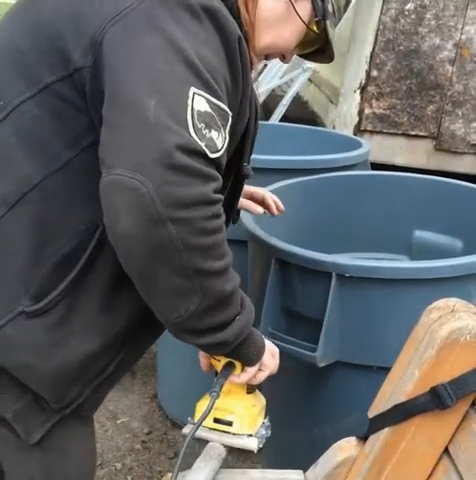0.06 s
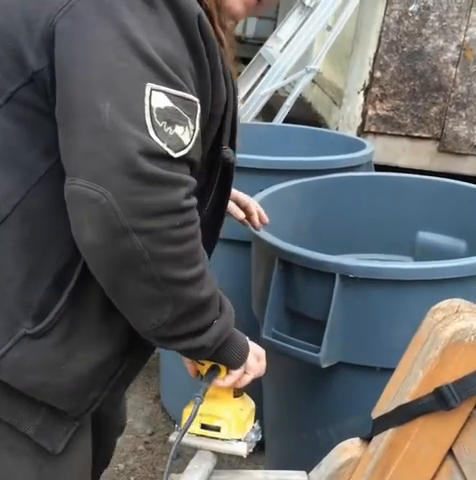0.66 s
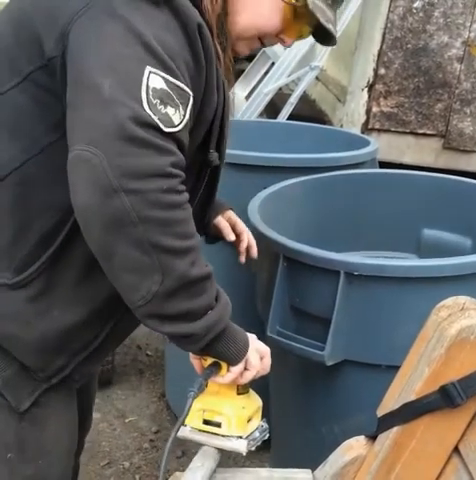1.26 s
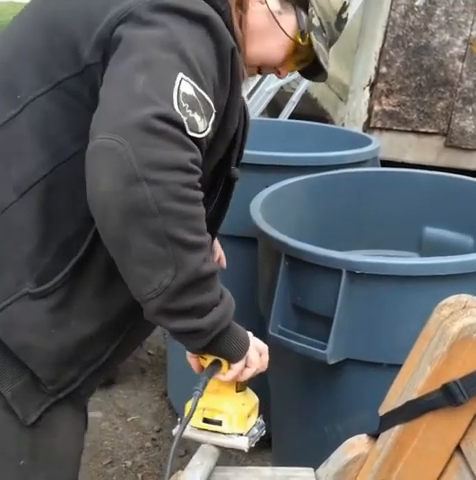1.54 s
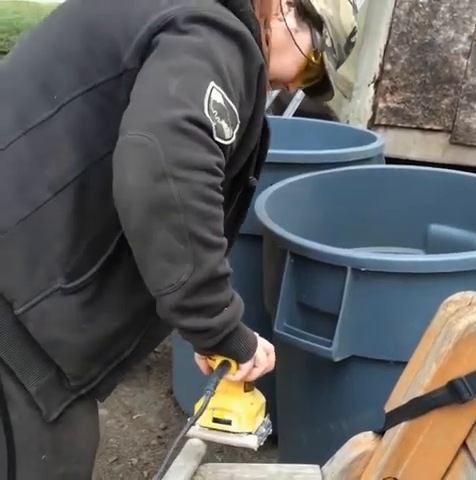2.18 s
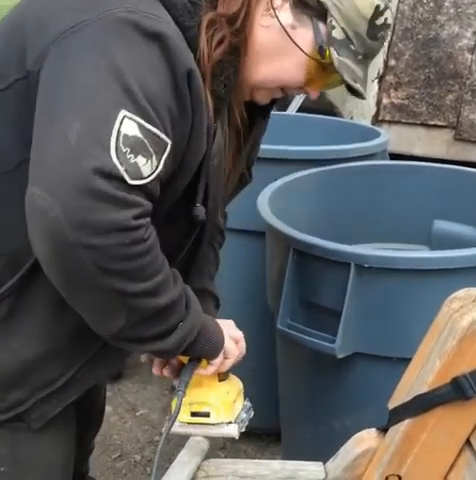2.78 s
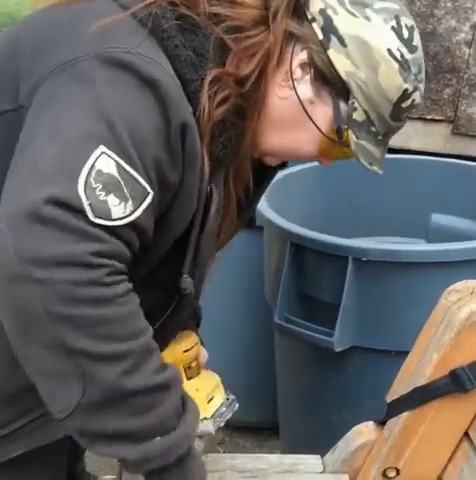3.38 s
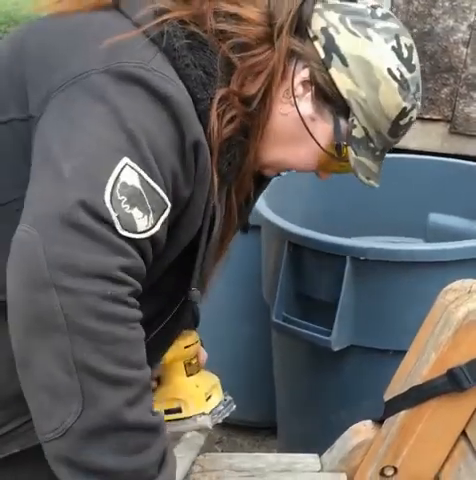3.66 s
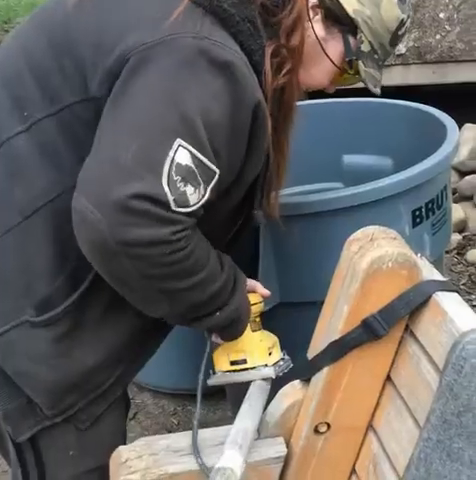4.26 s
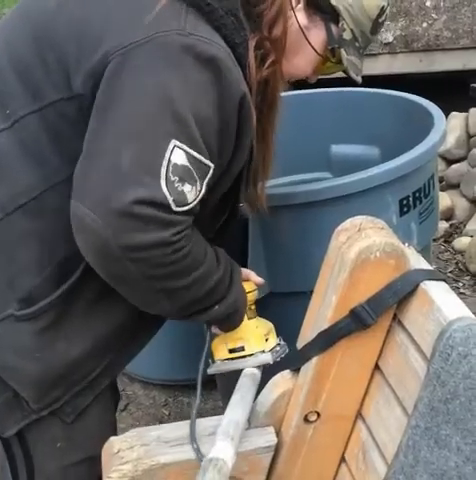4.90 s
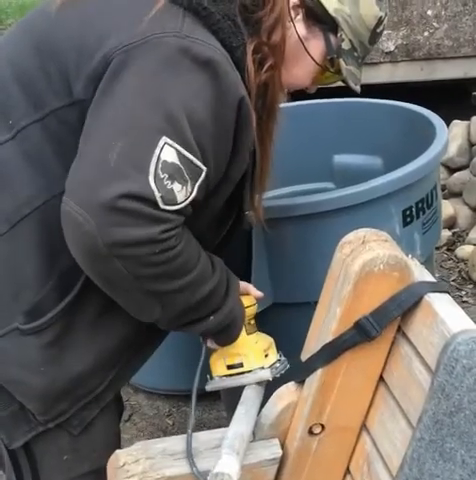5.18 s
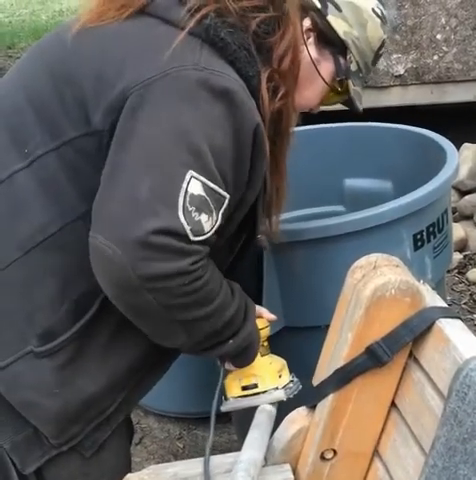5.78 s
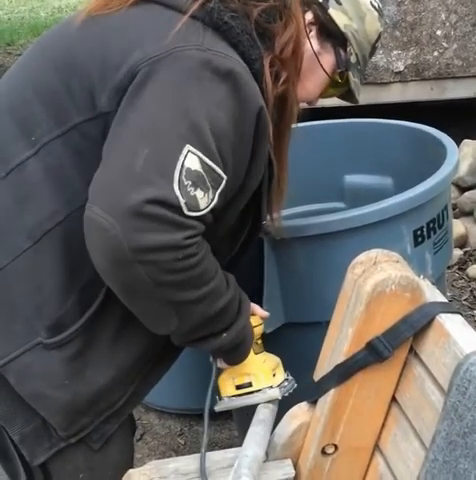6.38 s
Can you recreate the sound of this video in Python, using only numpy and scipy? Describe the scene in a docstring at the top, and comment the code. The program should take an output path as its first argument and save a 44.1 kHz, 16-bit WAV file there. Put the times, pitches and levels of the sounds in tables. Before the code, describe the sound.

A small electric sander grinds on wood near the microphone, with a droning hum, a whine and a gritty rasp that swell slightly with each stroke. The pressure eases and the tool slows into a descending buzz. The sound cuts out for a split second, then resumes at full speed with a slightly different wooden tone and stays even, over a faint outdoor rumble.

```python
"""Outdoors, over a faint low rumble, a mains-powered palm sander works a wooden handle.
Its weighted shaft hums, its loaded motor whines, its pad chatters on the ringing wood, its grit hisses.
The motor sags as the tool is shifted, and the pad knocks once a turn in an even, falling buzz.
After an instant of silence the sander is at full speed again on a second spot of the handle."""
import sys
import numpy as np
from scipy import signal
from scipy.fft import rfft, irfft, next_fast_len
from scipy.io import wavfile
from scipy.ndimage import map_coordinates

SR = 44100
rng = np.random.default_rng(int(sys.argv[2]) if len(sys.argv) > 2 else 0)


def pcm_store(signal):
    """Save signal as 16-bit PCM."""
    levels = np.round(np.clip(np.atleast_2d(signal), -1, 1) * 32767)
    wavfile.write(sys.argv[1], SR, levels.astype(np.int16).T)


N = 293262
TIME_S = np.arange(N) / SR
SILENCE_S = (4.109, 4.155)  # between the two spots


def amp(db):
    """Decibels to gain."""
    return 10 ** (np.asarray(db) / 20)

def unit(x):
    """x at rms 1."""
    return x / np.sqrt(np.mean(x ** 2) + 1e-20)

def curves(rows):
    """One value per sample for each column after the time."""
    times_s, *columns = np.transpose(rows)
    return [np.interp(TIME_S, times_s, column) for column in columns]

def held(start_s, end_s, ramp_s):
    """Attack, hold and release, 0 to 1."""
    return np.clip(.5 + np.minimum(TIME_S - start_s, end_s - TIME_S) / ramp_s, 0, 1)

def swells(rows):
    """A sum of bell curves, one per (centre in seconds, half width in seconds, height)."""
    grid_s = TIME_S[::SR // 1000]
    total = sum(height * np.exp(-((grid_s - s) / width_s) ** 2) for s, width_s, height in rows)
    return np.interp(TIME_S, grid_s, total)

def wobble(rate_hz, size=N):
    """A smooth random curve with knots at rate_hz."""
    knots = rng.standard_normal(int(size * rate_hz / SR) + 4)
    return map_coordinates(knots, [np.arange(size) * rate_hz / SR])

def by_spot(first, second):
    """One value on the first spot, another on the second."""
    return np.where(TIME_S < np.mean(SILENCE_S), first, second)

def body_response(spectrum, resonances=()):
    """Frequencies and causal log response (log gain + j phase) of a ringing body."""
    size = 2 * next_fast_len(N // 2 + SR // 4)
    hz = np.fft.rfftfreq(size, 1 / SR)
    knots_hz, knots_db = np.transpose(spectrum)
    db = np.interp(np.log(hz + 1), np.log(knots_hz), knots_db)
    for centre_hz, width_hz, lift_db in resonances:
        db += lift_db / (1 + (2 * (hz - centre_hz) / width_hz) ** 2)
    cepstrum = irfft(np.log(amp(db)))
    cepstrum[size // 2:] = 0
    return hz, rfft(2 * cepstrum)

def colour(x, spectrum, resonances=()):
    """x rung through a body, at rms 1."""
    hz, response = body_response(spectrum, resonances)
    return unit(irfft(rfft(x, 2 * (len(hz) - 1)) * np.exp(response))[:N])

def grains(force, per_s, spread_db):
    """Tiny impacts of uneven size, harder under more force."""
    hits = rng.random(N) < per_s / SR
    return force * hits * rng.choice([-1, 1], N) * amp(spread_db * rng.standard_normal(N))

# The rumble's swell, then the thump. Each row: centre in seconds, half width in seconds, level in dB.
LOW_SWELLS = [(3.92, 0.3, -54.5), (4.163, 0.02, -43)]

def rumble_and_thump(first_db=-72, second_db=-64.5):
    """A faint low rumble swells as the motor slows; a soft thump marks the cut where sound returns."""
    level = amp(by_spot(first_db, second_db))
    level += swells([(s, width_s, amp(db)) for s, width_s, db in LOW_SWELLS])
    return level * colour(rng.standard_normal(N), [(20, -8), (70, -1), (130, 6), (300, -6), (3000, -33)])

def with_echoes(x, echo_db=-14, spread_s=.025, count=14):
    """Ground, bench and bins throw back weak early echoes."""
    delays = (SR * (.002 + spread_s * rng.random(count))).astype(int)
    echoes = sum(rng.choice([-1, 1]) * np.pad(x, (delay, 0))[:N] for delay in delays)
    return x + amp(echo_db) * echoes / np.sqrt(count)

# Each row: time in seconds, contact in dB.
EASING = [(3.25, -1.5), (3.31, 0.5), (3.345, -8), (3.39, -5), (3.43, -1.5), (3.63, -2), (3.7, -12),
          (3.94, -18), (4.03, -9), (4.1, -19)]

def ease_db():
    """The hand eases the pad off the first spot."""
    return by_spot(curves(EASING)[0], 0)

def tilted():
    """1 while the pad stands on its edge."""
    return held(3.41, 3.67, ramp_s=0.17)

# The paper catches. Each row: centre in seconds, half width in seconds, lift in dB.
CATCHES = [(0.33, 0.059, 3), (0.71, 0.026, 6.5), (1.28, 0.14, 2.5), (1.72, 0.28, 1.5), (2.1, 0.059, 3.5),
           (2.62, 0.3, 3), (3.02, 0.17, 0.5), (5.0, 0.07, 1.5), (6.33, 0.05, 0.5), (6.55, 0.021, 2.5)]
# Each mix: first spot in dB, second spot in dB, share of catch, share of easing, tilt change in dB.
CHATTER_MIX = (-24, -24.5, 0.86, 1, 0)
RASP_MIX = (-20.5, -22.5, 0.27, 0.62, -3)
HISS_MIX = (-26, -26.5, 0.17, 0.21, -2.5)

def layer_db(mix, waver_db=0.5):
    """A contact layer rises as the paper catches and falls as the pad is eased off or tilted."""
    first_db, second_db, catch_share, ease_share, tilt_db = mix
    base_db = by_spot(first_db, second_db) + waver_db * wobble(11)
    return base_db + catch_share * swells(CATCHES) + ease_share * ease_db() + tilt_db * tilted()

# Each row: time in seconds, shaft speed in Hz, hum in dB.
MOTOR = [(0, 216.8, -35), (0.72, 208, -31.5), (1.17, 210, -35), (1.43, 203.8, -38.5), (1.85, 206.2, -38),
         (2.3, 209.7, -36), (2.56, 209.7, -36), (2.68, 213, -35), (3.04, 213.3, -33), (3.15, 201.5, -35),
         (3.27, 195.9, -37), (3.32, 191.5, -34.5), (3.41, 181.9, -34.5), (3.5, 179.5, -37),
         (3.6, 179.8, -35.5), (3.655, 177.4, -36), (3.7, 171.2, -36), (3.76, 161.8, -37),
         (3.88, 149.4, -39), (3.955, 139, -48), (4.0, 135.5, -42.5), (4.11, 123.1, -43),
         (4.135, 208.6, -38), (4.22, 208, -35.5), (4.7, 208.9, -36), (4.85, 210.4, -37),
         (5.3, 210.5, -36.5), (5.75, 208, -38.5), (6.65, 210.8, -36)]
# Hand strokes rock the pad. Each row: centre in seconds, swell of the hum's octave in dB.
STROKES = [(0.52, -39.5), (2.03, -40), (2.92, -48), (4.28, -45), (4.66, -43.5), (5.14, -46), (5.49, -44.5),
           (5.96, -44), (6.36, -44)]
STROKE_HALF_WIDTH_S = 0.0849

def motor(drag_hz=1.2, dip_db=2.5, flutter_hz=0.607):
    """Shaft speed and hum level: each stroke drags the motor and weakens its fundamental."""
    shaft_hz, hum_db = curves(MOTOR)
    push = swells([(s, STROKE_HALF_WIDTH_S, 1) for s, _ in STROKES])
    push -= push.mean()
    return shaft_hz - drag_hz * push + flutter_hz * wobble(16), hum_db - dip_db * push

# Housing resonances that the third order slides through. Each row: frequency in Hz, level in dB.
THIRD_ORDER = [(390, -42.5), (460, -42.5), (513, -29), (540, -29.5), (562, -29), (590, -41), (614, -35),
               (628, -36), (645, -37.5)]

def hum(angle, shaft_hz, hum_db, octave_floor_db=-54.5, eased_octave_re_hum_db=-7.5):
    """The off-centre weight shakes the housing at the first three multiples of the shaft speed."""
    eased = held(EASING[0][0], SILENCE_S[0], ramp_s=0.17)
    octave = amp(octave_floor_db) + swells([(s, STROKE_HALF_WIDTH_S, amp(db)) for s, db in STROKES])
    octave += amp(hum_db + eased_octave_re_hum_db) * eased
    third_db = np.interp(3 * shaft_hz, *np.transpose(THIRD_ORDER)) + by_spot(0, -1.5)
    jostle_rad = 0.19 * amp(ease_db()) * wobble(55)  # the wood jostles the overtones
    out = np.zeros(N)
    for order, level in enumerate([amp(hum_db), octave, amp(third_db)], 1):
        flicker = amp(0.41 * order * wobble(10)) * (1 + 0.069 * order * wobble(45))
        out += level * flicker * np.sqrt(2) * np.sin(order * angle + (order - 1) * jostle_rad)
    return out

# Each row: shaft order, ripple order, dB over the chatter on the first spot, the same on the second.
WHINE_TONES = [(0.98, 1, -50, -31), (2.007, -1, -36.5, -30), (2, 1, -25.5, -27), (3, 1, -21.5, -16),
               (5, -1, -16, -8), (6, 0, -20, -15), (7, 0, -14, -26), (8, -1, -16.5, -14),
               (8, 0, -13.5, -16), (9, 0, -16, -20), (11, 0, -21, -20), (13, 0, -26, -20)]

def whine(angle, ripple, waver_db=2.5, drift_rad=0.34, grind_rad=0.053):
    """The loaded motor sings, with side tones from the mains torque; grinding roughens high orders."""
    load_db = layer_db(CHATTER_MIX)
    out = np.zeros(N)
    for order, ripple_order, first_db, second_db in WHINE_TONES:
        level = amp(load_db + by_spot(first_db, second_db) + waver_db * wobble(16))
        jitter_rad = drift_rad * wobble(25) + grind_rad * order * wobble(70)
        out += level * np.sqrt(2) * np.sin(order * angle + ripple_order * ripple + jitter_rad)
    return out

# Each row: start in seconds, end in seconds, shaft order, ripple order, level in dB.
SUNG_TONES = [(2.62, 3.05, 13, 0, -33), (2.64, 3.0, 14, 0, -39), (2.58, 2.85, 15, 0, -36),
              (2.747, 3.2, 6, 0, -34), (3.08, 3.3, 8, 0, -30), (3.29, 3.39, 16, 0, -34),
              (3.325, 3.41, 14, 0, -31), (3.322, 3.408, 8, 0, -23), (3.3, 3.41, 5, 0, -30),
              (3.32, 3.41, 7, 0, -32), (4.18, 4.27, 5, -1, -24.5), (4.38, 4.44, 5, -1, -29),
              (4.537, 4.697, 5, -1, -27), (4.898, 5.112, 5, -1, -27), (5.2, 5.6, 5, -1, -26.5),
              (5.651, 6.05, 5, -1, -30.5), (6.14, 6.41, 5, -1, -24), (6.52, 6.61, 5, -1, -32)]

def singing(angle, ripple, waver_db=0.5, drift_rad=0.44):
    """For a moment the pad falls in with one motor tone and holds it."""
    out = np.zeros(N)
    for start_s, end_s, order, ripple_order, db in SUNG_TONES:
        level = amp(db) * held(start_s, end_s, ramp_s=0.047)
        on = level > 0
        phase = order * angle[on] + ripple_order * ripple[on] + drift_rad * wobble(31.3, on.sum())
        out[on] += level[on] * amp(waver_db * wobble(34, on.sum())) * np.sqrt(2) * np.cos(phase)
    return out

# Each row: start in seconds, end in seconds, gain in dB.
BUZZ_SPELLS = [(3.32, 3.42, -5.5), (3.42, 3.67, -7), (3.67, 3.785, 0.5), (3.785, 3.946, 1),
               (3.953, 4.15, -4.5)]
# Ring of the tapping pad. Each row: frequency in Hz, level of an overtone there in dB.
PAD_RING = [(500, -34.5), (650, -33), (820, -35), (960, -35), (1050, -36), (1210, -30), (1330, -41),
            (1410, -28.5), (1490, -24.5), (1560, -26.5), (1640, -28), (1735, -38.5), (1890, -31),
            (2100, -37), (2280, -38.5), (2480, -39.5), (2680, -33.5), (3000, -50), (3200, -42), (3550, -48),
            (4100, -47), (4500, -45), (4780, -43), (5100, -49), (5500, -42), (5850, -47), (6280, -42),
            (6600, -49), (7000, -48), (8500, -51)]
# Shape of the knock. Each row: shaft order, lift in dB.
KNOCK_LIFTS = [(5, 4), (6, 0), (7, 1), (8, -12), (11, -2)]

def buzz(angle, shaft_hz, waver_db=2.3, drift_rad=0.014, scatter_rad=0.95):
    """Lightly loaded, the pad knocks once a turn; the overtones slide down through its resonances."""
    level = sum(amp(db) * held(start_s, end_s, ramp_s=0.043) for start_s, end_s, db in BUZZ_SPELLS)
    on = level > 0
    hz, response = body_response(PAD_RING)
    out = np.zeros(N)
    for order in range(4, 56):
        tone_hz = order * shaft_hz[on]
        db = np.interp(tone_hz, *np.transpose(PAD_RING)) + dict(KNOCK_LIFTS).get(order, 0)
        lag_rad = np.interp(tone_hz, hz, response.imag) + scatter_rad * rng.standard_normal()
        phase = order * angle[on] + lag_rad + drift_rad * order * wobble(90.3, on.sum())
        out[on] += amp(db + waver_db * wobble(20.35, on.sum())) * np.sqrt(2) * np.sin(phase)
    return level * out

def pad_force(angle, ripple):
    """Pad force swings with the orbit, the mains ripple and the beats between the two."""
    orbit = 0.06 * (np.cos(angle) + np.cos(2 * angle))
    beats = 0.095 * np.cos(angle - ripple) + 0.038 * np.cos(angle - 2 * ripple)
    stutter = 0.045 * wobble(70)
    return np.exp(orbit + 0.047 * np.cos(ripple) + beats + stutter)

# Each row: centre in seconds, half width in seconds, frequency in Hz, bandwidth in Hz, level in dB.
WOOD_RINGS = [(0.06, 0.07, 1046, 120, -25.5), (0.45, 0.4, 1620, 160, -28.5), (0.65, 0.29, 1895, 70, -29),
              (1.26, 0.14, 982, 80, -25), (1.25, 0.59, 3520, 600, -29.5), (1.72, 0.17, 984, 110, -26.5),
              (1.8, 0.12, 1880, 60, -33), (2.08, 0.18, 880, 70, -29), (2.2, 0.14, 1027, 60, -27),
              (2.35, 0.3, 1880, 70, -32), (2.66, 0.069, 1630, 110, -25), (3.02, 0.26, 1013, 110, -25),
              (3.25, 0.07, 960, 129, -26.5), (3.22, 0.1, 1550, 130, -32), (3.56, 0.1, 1470, 110, -28),
              (4.07, 0.05, 1600, 900, -29)]

def ringing(force):
    """Bounces of the passing pad stir one resonance of the wood for a while."""
    out = np.zeros(N)
    for centre_s, width_s, hz, width_hz, db in WOOD_RINGS:
        b, a = signal.iirpeak(hz, hz / (1.5 * width_hz), SR)  # two passes narrow it to about width_hz
        bounces = grains(force, per_s=1500, spread_db=0.5)
        ring = signal.lfilter(b, a, signal.lfilter(b, a, bounces))
        out += amp(db) * np.exp(-((TIME_S - centre_s) / width_s) ** 2) * unit(ring)
    return out

# Each row: frequency in Hz, bandwidth in Hz, lift in dB.
FIRST_SPOT_MODES = [(548, 54, 8.5), (859, 50, 4), (1043, 120, 10), (1380, 50, -0.5), (1605, 205, 9),
                    (1780, 63, -2.5), (1880, 120, 8.5), (1980, 110, -2), (2400, 360, 4.5), (3700, 630, 2),
                    (4500, 89, 4), (5930, 300, -0.5)]
SECOND_SPOT_MODES = [(547, 65, 9.5), (734, 12, 6), (917, 105, 8.5), (1058, 130, 7.5), (1210, 55, -12),
                     (1559, 59, 6.5), (1670, 97, 9.5), (1830, 100, 0.5), (2017, 160, 9), (2360, 200, 6.5),
                     (2520, 100, 2.5), (2734, 77, 7.5), (3630, 330, 1.5), (4830, 270, 1.5), (5270, 220, -3),
                     (5440, 180, 2), (8000, 270, 1.5)]

def wood(x, spectrum):
    """Pad and handle resonate with their own modes on each spot."""
    return by_spot(colour(x, spectrum, FIRST_SPOT_MODES), colour(x, spectrum, SECOND_SPOT_MODES))

def wander(x, depth_s=0.0016, rate_hz=5):
    """The resonances drift in pitch as the pad moves about."""
    return map_coordinates(x, [np.arange(N) + depth_s * SR * wobble(rate_hz)], mode="mirror")

# Contact spectra. Each row: frequency in Hz, relative density in dB.
CHATTER_SPECTRUM = [(30, -53), (100, -33), (180, -12), (280, -16.5), (450, -15.5), (680, -10), (820, -1.5),
                    (1100, -1.5), (1300, -0.5), (1700, -24), (3000, -50.5)]
RASP_SPECTRUM = [(400, -35.5), (1000, -15), (1350, -5), (2000, -4), (3000, -5), (4200, -8), (5500, -9.5),
                 (9000, -43)]
HISS_SPECTRUM = [(1500, -32), (3800, -1.5), (5200, -1), (7000, 1), (10000, -3.5), (13000, -8),
                 (15300, -13.5)]
THIN_HISS_SPECTRUM = [(1500, -21), (2600, -2), (3800, -4.5), (5500, -2.5), (7500, -1), (10000, -3),
                      (13000, -8), (15300, -12)]
# The grit bites or skips. Each row: centre in seconds, half width in seconds, hiss change in dB.
GRIT_BITES = [(0.13, 0.03, 2.5), (0.707, 0.012, 3), (1.03, 0.014, 2), (1.28, 0.015, 3), (2.105, 0.017, 2.5),
              (2.65, 0.03, 1.5), (3.49, 0.025, -3.5), (3.745, 0.019, 3)]

def sanding(force, edge_db=-24):
    """The pad bounces and rasps as the grit cuts; tilted, its edge scrapes; lifted, the hiss thins."""
    chatter_gain = amp(layer_db(CHATTER_MIX, waver_db=0))
    rasp_gain = amp(layer_db(RASP_MIX))
    hiss_gain = amp(layer_db(HISS_MIX) + swells(GRIT_BITES))
    chatter = wander(wood(grains(force, per_s=2500, spread_db=1), CHATTER_SPECTRUM))
    rasp = wood(grains(force, per_s=12000, spread_db=2.5), RASP_SPECTRUM)
    cuts = grains(force, per_s=25000, spread_db=3.5)
    lifted = held(3.67, 4.14, ramp_s=0.06)
    hiss = (1 - lifted) * wood(cuts, HISS_SPECTRUM) + lifted * colour(cuts, THIN_HISS_SPECTRUM)
    scratches = grains(force, per_s=12000, spread_db=2.5)
    edge = colour(scratches, [(600, -40), (2450, 9), (6000, -41)], resonances=[(2500, 420, 5.1)])
    return chatter_gain * chatter + rasp_gain * rasp + hiss_gain * hiss + amp(edge_db) * tilted() * edge

def scene(ripple_hz=120):
    """The sander, close by, over a faint low rumble."""
    shaft_hz, hum_db = motor()
    angle = 2 * np.pi * np.cumsum(shaft_hz) / SR
    ripple = 2 * np.pi * ripple_hz * TIME_S  # phase of the pulsing mains torque
    force = pad_force(angle, ripple)
    contact = with_echoes(sanding(force) + ringing(force)) + buzz(angle, shaft_hz)
    tones = hum(angle, shaft_hz, hum_db) + whine(angle, ripple) + singing(angle, ripple)
    sound = rumble_and_thump() + tones + contact
    return np.array([sound, sound])

def record(dry, top_hz=15500, silence_db=-51, fade_s=0.0038):
    """The sound breaks off for an instant, and the highest treble is cut."""
    inside_s = np.minimum(TIME_S - SILENCE_S[0], SILENCE_S[1] - TIME_S)
    gate = amp(silence_db * np.clip(inside_s / fade_s, 0, 1))
    size = next_fast_len(N + SR // 4)
    passband = np.fft.rfftfreq(size, 1 / SR) < top_hz
    return irfft(rfft(dry * gate, size) * passband, size)[:, :N]


dry = scene()
out = record(dry)
pcm_store(out)
```